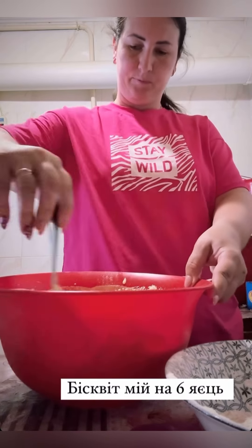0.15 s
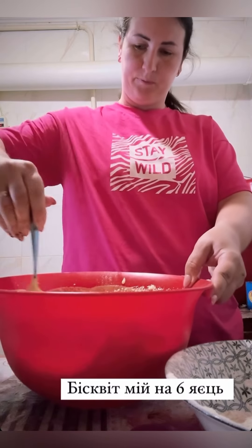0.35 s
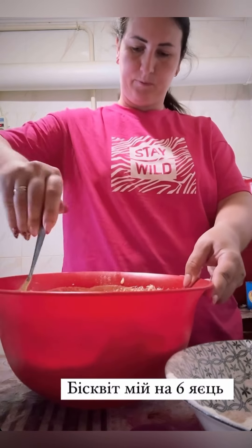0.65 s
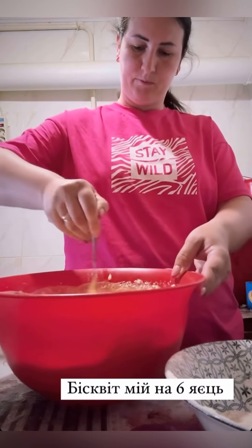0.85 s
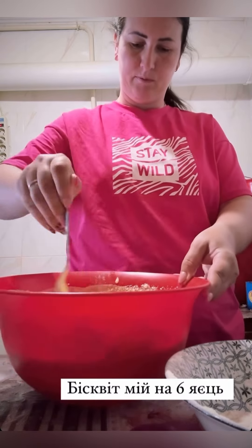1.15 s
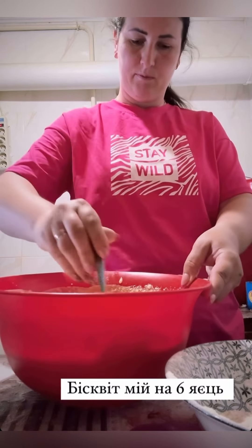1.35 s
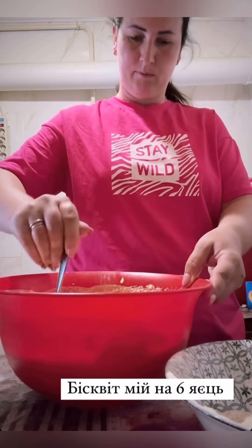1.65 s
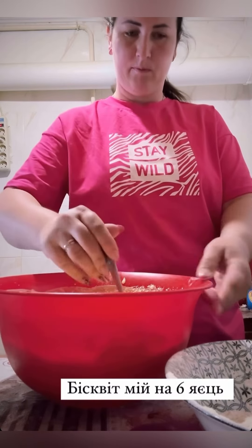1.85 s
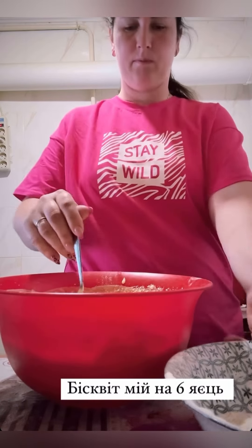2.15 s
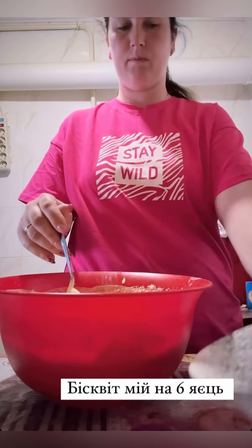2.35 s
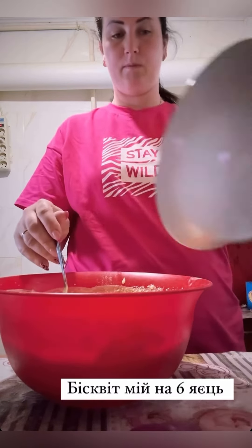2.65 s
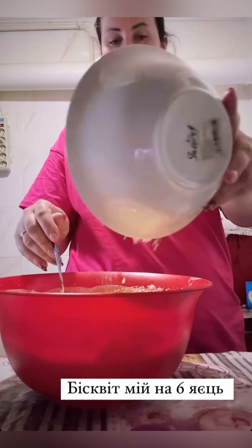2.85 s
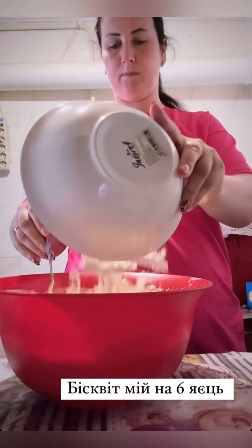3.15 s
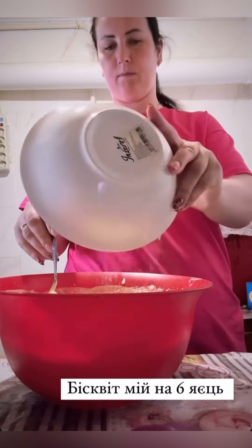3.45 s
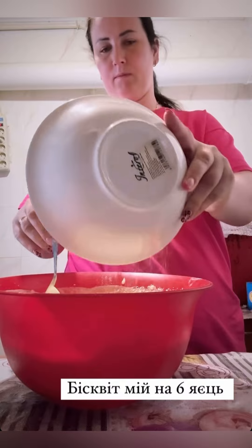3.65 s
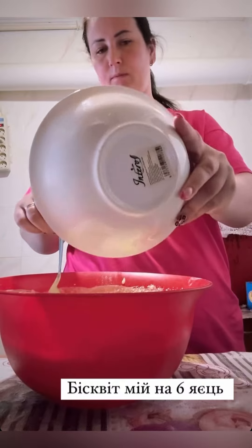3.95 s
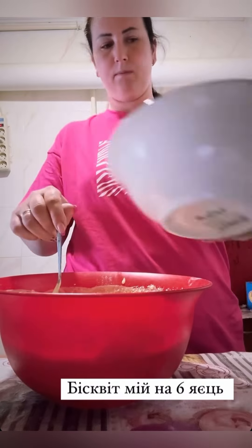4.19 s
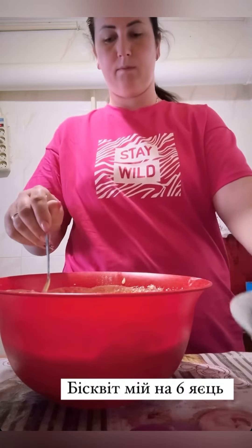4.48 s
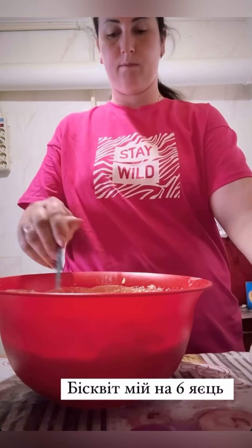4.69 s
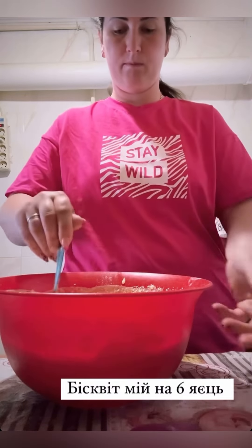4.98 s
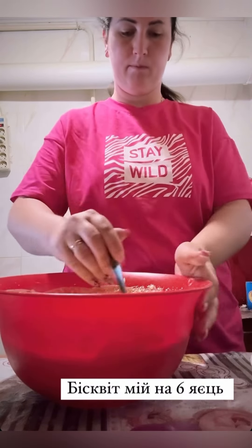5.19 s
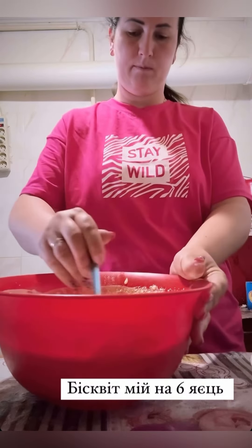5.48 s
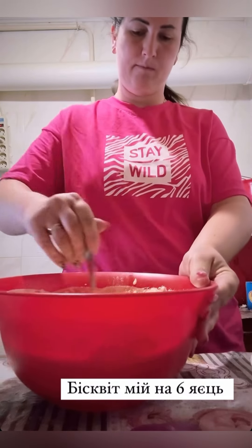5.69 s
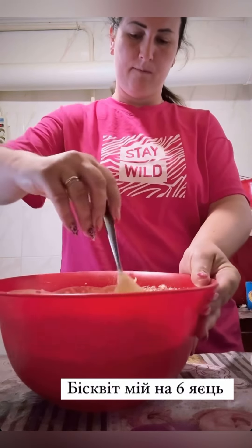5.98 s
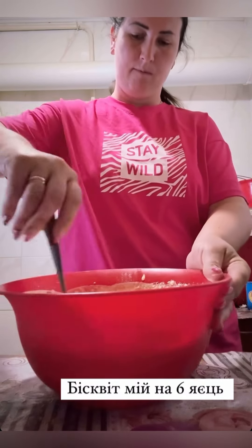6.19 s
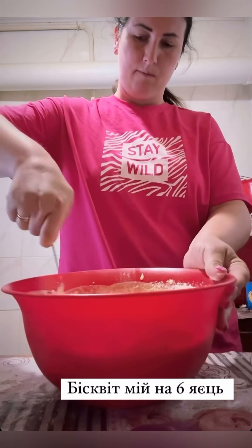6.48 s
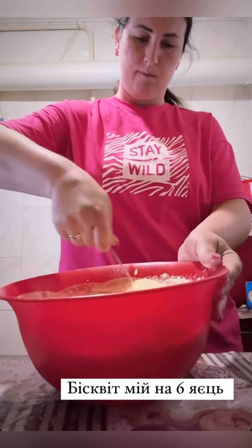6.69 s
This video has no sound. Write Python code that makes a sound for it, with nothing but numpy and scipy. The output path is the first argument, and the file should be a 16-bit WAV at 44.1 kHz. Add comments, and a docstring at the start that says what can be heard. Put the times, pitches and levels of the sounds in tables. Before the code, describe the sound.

Irregular spoon strokes rasp around a plastic mixing bowl; a soft wet tumble of fruit, a heavy table clunk, then more scraping.

```python
"""A metal spoon stirs thick batter in a plastic bowl: stick-slip grains and blows excite decaying modes and hiss.
Sticky batter lets go in short noise bursts; chopped fruit tipped in patters as coloured wet grains.
A second bowl is set down hard: blows ring the table's modes under a phone standing on it, and sines sing on.
Mains hum is a wavering sine; room air is coloured noise; a faint tick is noise bursts in alternating steps.
Dense decaying noise echoes stand for the kitchen."""
import sys
import numpy as np
from scipy import signal
from scipy.fft import rfft, irfft, next_fast_len
from scipy.io import wavfile
from scipy.ndimage import uniform_filter1d

SR = 44100
rng = np.random.default_rng(int(sys.argv[2]) if len(sys.argv) > 2 else 0)


def generate_wav(signal):
    """Clip the signal to [-1, 1] and save it as 16-bit WAV at the path in sys.argv[1]."""
    frames = np.transpose(np.atleast_2d(signal))
    scaled = np.clip(frames, -1, 1) * 32767
    pcm = np.round(scaled).astype(np.int16)
    wavfile.write(sys.argv[1], SR, pcm)


N = 301203

# All levels in the tables are relative; each source sets its own gain.
# strokes of the spoon along the wall: (start [s], length [s], scrape level [dB],
# sizzle above the scrape at the start [dB], at the end [dB])
STROKES = [(0.002, 0.097, -32, -10, 0), (0.153, .13, -33, -1, -7), (0.536, 0.16, -30.5, -14, -3.5),
           (0.73, 0.092, -33.5, -7.5, -5.5), (0.814, 0.047, -36, 5, -12), (0.988, 0.06, -42.5, -19, -10),
           (1.046, 0.21, -45, -18, -14.5), (1.282, 0.13, -27, -5, -7), (1.607, 0.062, -40, -9.5, -14.5),
           (1.67, 0.092, -25, -22.5, -7.5), (1.764, 0.034, -30, -3, -15.5), (1.953, 0.11, -46.5, -3, -16),
           (2.037, 0.13, -42, 0.5, -6), (4.727, 0.089, -44, 0.5, -5.5), (4.858, 0.14, -67, 14, -3),
           (5.046, 0.051, -49, -12, -22), (5.128, 0.031, -33, 4.5, -9), (5.167, 0.021, -31, -12, -8),
           (5.24, 0.088, -30.5, -15.5, -14.5), (5.369, 0.1, -31, -25, 5), (5.461, 0.1, -27, -1.5, -15.5),
           (5.582, 0.057, -26, -20, -13), (5.869, 0.045, -51, -9, -16), (5.917, 0.22, -39.5, -8.5, -6.5),
           (6.159, 0.048, -29, -14.5, -13.5), (6.257, 0.048, -31, -29, -7), (6.34, 0.091, -29.5, -8, -11.5),
           (6.475, 0.2, -34, -8, -13.5), (6.782, 0.027, -43, -14.5, -14.5)]
# spoon and fruit against the bowl: (time [s], bass level [dB], middle level [dB], treble level [dB])
BOWL_KNOCKS = [(0.541, -15, -9.5, -19), (0.57, -27, -30, -29), (1.268, -8, -14.5, -27),
               (1.576, -0.5, -3.5, -9), (1.694, -40, -14, -20.5), (2.037, -22, -28.5, -33.5),
               (3.119, -31, -37, -48), (3.158, -21.5, -30.5, -58), (3.181, -21, -27.5, -44),
               (3.206, -37.5, -36, -49), (4.722, -38, -35, -40), (5.112, -4.5, -21, -28),
               (5.241, -16, -36.5, -31.5), (5.357, -68, -19, -24.5), (5.398, -18.5, -17.5, -40),
               (6.167, -17.5, -15.5, -45.5), (6.792, -25.5, -46, -44.5)]
# the spoon edge catches on the wall, a thin bright knock: (time [s], level [dB])
EDGE_CATCHES = [(0.026, -30.5), (0.061, -36), (0.074, -21.5), (0.136, -28.5), (.249, -25.5), (0.257, -29),
                (0.683, -29.5), (0.696, -22.5), (0.766, -27), (0.788, -22.5), (0.805, -25.5),
                (1.323, -27.5), (1.353, -23.5), (1.381, -23.5), (1.398, -22), (1.413, -26.5), (1.726, -21),
                (1.74, -24), (5.099, -30.5), (5.52, -21.5), (5.641, -18.5), (6.269, -32), (6.319, -27.5)]
# modes of the plastic bowl: (frequency [Hz], level [dB], t60 [s])
BOWL_MODES = [(121, -6, 0.15), (156, -3, 0.091), (214.2, -1, 0.049), (275, 0, 0.078), (316, 5, 0.024),
              (464, -0.5, 0.046), (491, 1.5, 0.054), (656, 9.5, 0.013), (801, 2, 0.016), (987, -0.5, 0.014),
              (1364, -0.5, 0.019), (1674, -2.5, 0.036), (1761.3, 1.5, 0.017), (2066, 5, 0.022),
              (2540, -5.5, 0.011), (2736, -5, 0.042), (2960, -1.5, 0.02), (3423, -5.5, 0.023),
              (3813, -8, 0.014), (4700, -9.5, 0.0012)]
# modes of the metal spoon: (frequency [Hz], level [dB], t60 [s])
SPOON_MODES = [(3100, -10, 0.024), (4620, -4, 0.009), (4820, -2, 0.021), (5600, -7.5, 0.0076),
               (6680, -4, 0.0073)]
# spectrum of the scraping hiss: (frequency [Hz], level per Hz [dB])
SCRAPE_SPECTRUM = [(700, 0), (1300, -15), (1900, -5), (3200, 4.5), (4500, -3.5), (6500, -1), (8000, -20)]
# spectrum of the high sizzle: (frequency [Hz], level per Hz [dB])
SIZZLE_SPECTRUM = [(5000, -12.5), (7000, 2.5), (9000, 0), (10700, -2), (12500, 3), (15500, -4)]
# sticky batter lets go with a bright snap: (time [s], level [dB])
BATTER_SMACKS = [(0.4868, -25), (0.508, -28.5), (0.9136, -29), (0.953, -31.5), (1.0241, -26),
                 (1.1847, -29.5), (2.0378, -22.5), (4.7195, -16.5), (5.1592, -6.5), (5.351, -16),
                 (5.7442, -18), (5.7699, -27.5), (5.913, -34), (5.9514, -22), (5.9734, -15), (6.126, -19.5)]
# spectrum of those snaps: (frequency [Hz], level per Hz [dB])
SMACK_SPECTRUM = [(800, -13), (2500, -2), (6000, 0.5), (11000, 2.5), (15500, 1)]
# fruit tumbling in: (time [s], thud level [dB], wet patter level [dB])
FRUIT_POUR = [(2.82, -82, -77.5), (2.89, -38.5, -61.5), (2.946, -27.5, -50.5), (3.0, -26.5, -53.5),
              (3.15, -34, -57.5), (3.188, -32.5, -60), (3.234, -40, -68), (3.31, -74.5, -85.5)]
# spectrum of the wet patter: (frequency [Hz], level per Hz [dB])
PATTER_SPECTRUM = [(410, -8.5), (700, -3.5), (1060, -14.5), (1330, -6), (1520, -19.5), (1830, 1),
                   (2270, -23), (2860, -10), (5810, -25), (8450, -45)]
# the bowl is shoved against the table: (start [s], length [s], level [dB])
BOWL_SHOVES = [(0.0, 0.0047, -34), (.55, 0.013, -21.5), (.82, 0.033, -37), (1.04, 0.024, -36),
               (1.28, 0.0036, -31.5), (1.58, 0.012, -17), (1.69, 0.021, -27.5), (2.05, 0.02, -22),
               (5.12, 0.005, -15), (6.0, 0.14, -28)]
# dull blows into the table, from the bowl shifting, fruit landing and the second bowl set down
# and rocking: (time [s], bass level [dB], middle level [dB], treble level [dB])
TABLE_THUMPS = [(1.061, -26.5, -68, -60), (2.062, -13.5, -55.5, -24.5), (2.101, -21, -28.5, -26.5),
                (2.941, -35, -26.5, -37), (3.004, -40, -22.5, -33), (3.067, -28, -29.5, -35),
                (3.197, -22, -34.5, -46), (3.543, -78, -45, -67.5), (4.478, -32.5, -33, -13.5),
                (4.489, -2, -9, 0), (4.544, -11.5, -10.5, -25.5), (4.708, -20, -44, -59),
                (4.738, -22, -13, -31.5), (4.752, -4.5, 0, -18), (4.775, -26.5, -2, -57.5),
                (4.796, 1, -15, -49.5), (4.81, -8, -5.5, -19.5), (4.872, -19, -30.5, -44),
                (4.91, -15, -21, -53)]
# modes of the table: (frequency [Hz], level [dB], t60 [s])
TABLE_MODES = [(60.6, -4, 0.12), (90, 1.5, 0.12), (124.5, 0, 0.25), (149.5, -5, 0.21), (209.8, 4.5, 0.11),
               (264, -3, 0.11), (318, 0.5, 0.051), (387, 0, 0.05), (495, 1.5, 0.1), (570, 3, 0.047),
               (641, 3.5, 0.029), (772, 1, 0.024), (906, -4, 0.021), (1414, -11, 0.046),
               (1840, -3.5, 0.0037)]
# spectrum of the noise after a thump: (frequency [Hz], level per Hz [dB])
SLAM_SPECTRUM = [(400, 10.5), (1500, -16.5), (3000, -28), (9000, -29.5)]
# the second bowl sings faintly as it settles: (time [s], frequency [Hz], level [dB], t60 [s])
BOWL_SINGS = [(4.655, 2870, -53.5, 0.41), (4.86, 778, -51.5, 1)]
# spectrum of the tick, also of the snap after each blow: (frequency [Hz], level per Hz [dB])
TICK_SPECTRUM = [(600, -20.5), (1500, -1.5), (2500, -3.5), (5000, -7.5), (9000, -12), (15000, -12)]
# spectrum of the room air: (frequency [Hz], level per Hz [dB])
AIR_SPECTRUM = [(40, -28), (70, -2.5), (200, -12.5), (500, -12), (800, -22), (1200, -30.5), (2200, -26.5),
                (5000, -36), (16000, -36)]
# weighting of the sound thrown back by the walls: (frequency [Hz], level [dB])
WALL_WEIGHTS = [(60, -28.5), (150, -15), (400, 0), (1000, 7.5), (2500, 4), (5500, 5.5), (7000, -26.5),
                (9700, 2), (16000, -10.5)]
# the phone's two ports hear the treble out of step: (frequency [Hz], phase by which left leads [rad])
PORT_LEADS = [(20, 0), (900, .5), (1600, -.2), (3000, -.6), (4000, -.1), (5500, -.7), (7400, -np.pi),
              (8900, -np.pi), (10600, -2 * np.pi), (13000, -2 * np.pi), (14600, -3 * np.pi),
              (22050, -3 * np.pi)]
# the shaken phone hears blows differently at each port: (frequency [Hz], level [dB])
SHAKEN_WEIGHTS = [(60, -28.5), (250, -15), (500, -14), (1100, 6), (2200, -18), (4000, -16.5)]

STROKE_RISE_DB_PER_S, STROKE_FALL_DB_PER_S = 1498.5, 327
SETTLE_DB, SETTLE_DB_PER_S = -21.5, 69  # the batter slumps back after each stroke
CATCH_RASP_DB, CATCH_RISE_DB_PER_S, CATCH_FALL_DB_PER_S = -1.5, 1495.5, 750.5  # swell around a catch
FLEX_DB, LOAD_DB = -9, -8  # the wall flexes and the table is loaded in step with the scrape
SHOVE_RISE_DB_PER_S, SHOVE_FALL_DB_PER_S = 490.5, 221.5
KNOCK_TOP_DB = 1.5  # a full knock gains less from treble to top than a catch
CATCH_BASS_DB, CATCH_MIDDLE_DB, CATCH_TREBLE_DB = -24.5, -40.5, -9.5
CATCH_SPOON_DB, CATCH_CLICK_DB = -9, 7.5  # a catch also strikes the spoon and clicks drily
SPOON_DB, SPOON_FOLLOWS = -25.5, 1.2  # bright strokes ring the spoon; dB per dB of sizzle
LUCK_DB = 2.5  # how much a mode's share differs from blow to blow
WANDER_DB = 3.5  # how far each treble mode's share of the rub wanders
BASS_LAG_S = 0.00673  # how far 100 Hz trails the high-frequency limit through plastic and wood
TICK_FIRST_S, TICK_EVERY_S, TOCK_EARLY_S = .072, .2324, .008  # every second tick comes early
TICK_DB, TICK_T60_S, TICK_SOFT_S = -54.5, 0.13, 0.0073
HUM_HZ, HUM_DB = 49.2, -49
AIR_DB = -62.5
KITCHEN_T60_S, KITCHEN_DB = 0.14, -8.5
BASS_CUT_HZ, CUTOFF_HZ = 36, 15850


def stirring():
    """Friction and impact drive resonators: blows on bowl and table, and the rubbing sounds beside them."""
    scrape_db, sizzle_db, flex_db, load_db = stroke_levels()
    thud_db, patter_db = in_time(FRUIT_POUR)
    bright_db = np.maximum(sizzle_db, -20)
    slip = stick_slip()
    rub = amp(scrape_db - 0.16 * bright_db - 4.0) * slip  # duller strokes ring the bowl more
    judder = grains(per_s=430.0, spread_db=2.5, clump_db=1.0, clump_rate=74.0)
    flex = (amp(flex_db) + amp(thud_db - 19)) * judder
    push = (amp(load_db) + amp(thud_db)) * judder
    blows = bending(struck_bowl(rub, flex, sizzle_db) + struck_table(push))

    # a brighter stroke puts more into the hiss
    hiss_gain = amp(scrape_db + 0.92 * bright_db + 2.5)
    hiss = hiss_gain * patchy(slip, SCRAPE_SPECTRUM, patch_db=6.0, rate=3.8)
    fine = 0.16 * slip + rng.standard_normal(N)
    sizzle_gain = amp(scrape_db + sizzle_db + 2.5) + amp(patter_db - 7.0)
    sizzle = sizzle_gain * rms_one(colour(fine, SIZZLE_SPECTRUM))
    spoon = ringing_spoon(amp(scrape_db + SPOON_FOLLOWS * bright_db + SPOON_DB) * slip)
    clicks = cracks(EDGE_CATCHES, CATCH_CLICK_DB, 0.002, SCRAPE_SPECTRUM)
    return blows, hiss + sizzle + spoon + clicks + wet_patter(patter_db)


def stroke_levels():
    """Contact force follows the strokes: levels in dB of scrape, sizzle above it, wall flexing and load."""
    stroke_db, stroke, along = swells(STROKES, STROKE_RISE_DB_PER_S, STROKE_FALL_DB_PER_S)
    early_db, late_db = np.array(STROKES)[stroke, 3:].T
    sizzle_db = uniform_filter1d(early_db + along * (late_db - early_db), size=SR // 100)
    shove_db = swells(BOWL_SHOVES, SHOVE_RISE_DB_PER_S, SHOVE_FALL_DB_PER_S)[0]
    load_db = np.maximum(shove_db, stroke_db + LOAD_DB)
    settling = [(s, length, db + SETTLE_DB) for s, length, db, *_ in STROKES]
    settle_db = swells(settling, STROKE_RISE_DB_PER_S, SETTLE_DB_PER_S)[0]
    rasps = [(s, .004, db + CATCH_RASP_DB) for s, db in EDGE_CATCHES]
    rasp_db = swells(rasps, CATCH_RISE_DB_PER_S, CATCH_FALL_DB_PER_S)[0]
    scrape_db = np.max([stroke_db, settle_db, rasp_db], axis=0)
    return scrape_db, sizzle_db, stroke_db + FLEX_DB, load_db


def stick_slip():
    """Stick-slip friction: dense fine slips of the edge, with coarse grains caught under it; rms 1."""
    slip = grains(per_s=7000., spread_db=0.5, clump_db=0.5, clump_rate=13.0)
    grit = grains(per_s=550.0, spread_db=2.0, clump_db=3.0, clump_rate=24.0)
    return rms_one(slip + grit)


def struck_bowl(rub, flex, sizzle_db):
    """Modal excitation of a shell: blows ring every mode, rubbing the treble ones, flexing lower ones."""
    knocks = [(*row, row[3] + KNOCK_TOP_DB) for row in BOWL_KNOCKS]
    for s, db in EDGE_CATCHES:
        knocks.append((s, db + CATCH_BASS_DB, db + CATCH_MIDDLE_DB, db + CATCH_TREBLE_DB, db))

    def shaking(hz):
        """Continuous forcing of a mode: rub above 1750 Hz, flex from 250 Hz up to there."""
        if hz > 1750:
            # each mode wanders as the spoon moves round; above 2600 Hz brisk strokes reach it more
            tilt_db = .3 * sizzle_db * np.log2(hz / 2600)
            return amp(-31.0 + WANDER_DB * drift(16.0) + tilt_db) * rub
        share = amp(-2.0) if hz > 900 else hz > 250
        return amp(-27.0) * flex * share

    return body(BOWL_MODES, knocks, [150, 550, 1500, 3000], blow_db=-1.0,
                chatter_db=-30.5, chatter_s=0.045, shaking=shaking)


def struck_table(push):
    """Modal excitation of a plate: thumps ring every mode and the push only those below 250 Hz."""
    return body(TABLE_MODES, TABLE_THUMPS, [90, 205, 650], blow_db=-2.5,
                chatter_db=-36.5, chatter_s=0.22, shaking=lambda hz: amp(-31.5) * push * (hz < 250))


def body(modes, blows, column_hz, blow_db, chatter_db, chatter_s, shaking):
    """Modal superposition: blows weight each mode by their colour and chatter on; shaking(hz) adds force."""
    blows = np.array(blows)
    at = np.round(blows[:, 0] * SR).astype(int)
    out = np.zeros(N)
    luck = rng.normal(0, LUCK_DB, (len(at), len(modes)))
    chatter = amp(chatter_db) * grains(per_s=4600.0, spread_db=4.5, clump_db=3.0, clump_rate=180.0)
    for k, (hz, level_db, t60) in enumerate(modes):
        hits = np.zeros(N)
        tint_db = np.array([at_hz(hz, column_hz, row[1:]) for row in blows])
        hits[at] = amp(tint_db + blow_db + luck[:, k])
        force = hits + decay(hits, chatter_s) * chatter + shaking(hz)
        out += amp(level_db) * (-1) ** k * ring(force, hz, t60)  # neighbours in opposite phase
    return out


def bending(x):
    """Dispersion of bending waves: they are slower in the bass, so each blow sweeps downward."""
    size = next_fast_len(N + SR // 10)
    hz = np.maximum(np.arange(size // 2 + 1) * SR / size, 40)
    lag = BASS_LAG_S * (np.sqrt(100 / hz) - np.sqrt(100 / 2500))  # group delay, nil at 2500 Hz
    phase = 2 * np.pi * np.cumsum(lag) * SR / size
    return irfft(rfft(x, size) * np.exp(-1j * phase), size)[:N]


def ringing_spoon(brisk):
    """Resonance of a metal bar: brisk slips and the catches excite its modes, whose levels drift."""
    s, db = np.transpose(EDGE_CATCHES)
    brisk[np.round(s * SR).astype(int)] += amp(db + CATCH_SPOON_DB)
    return sum(amp(db + 4.9 * drift(11.0)) * ring(brisk, hz, t60) for hz, db, t60 in SPOON_MODES)


def patchy(x, spectrum, patch_db, rate):
    """Band modulation: half-octave slices of the coloured sound brighten and fade on their own; rms 1."""
    x = colour(x, spectrum)
    edges = 500 * 2 ** np.arange(0, 4.6, .5)
    out = np.zeros(N)
    for k, pair in enumerate(zip(edges, edges[1:])):
        band = signal.sosfilt(signal.butter(2, pair, "band", fs=SR, output="sos"), x)
        out += band * amp(patch_db * drift(rate)) * (-1) ** k
    return rms_one(out)


def wet_patter(patter_db):
    """Granular impacts: many small wet contacts of tumbling fruit merge into coloured noise."""
    wet = grains(per_s=4800.0, spread_db=1.0, clump_db=3.0, clump_rate=65.0)
    return amp(patter_db) * rms_one(colour(wet, PATTER_SPECTRUM))


def contact_noise():
    """Broadband transients: snaps after blows, a slam after each thump, smacks of batter letting go."""
    knocks = [(row[0], row[3]) for row in BOWL_KNOCKS] + list(EDGE_CATCHES)
    thumps = [(row[0], row[3]) for row in TABLE_THUMPS]
    snaps = cracks(knocks, -7.5, 0.05, TICK_SPECTRUM) + cracks(thumps, -27.5, 0.05, TICK_SPECTRUM)
    slams = cracks(thumps, -24.5, 0.57, SLAM_SPECTRUM)
    smacks = cracks(BATTER_SMACKS, -3.5, 0.005, SMACK_SPECTRUM)
    return snaps, slams, smacks


def cracks(blows, crack_db, t60, spectrum):
    """Exponential decay of broadband noise: a coloured burst that dies after each contact."""
    start = np.zeros(N)
    for s, level_db in blows:
        start[round(s * SR)] = amp(level_db + crack_db)
    return decay(start, t60) * rms_one(colour(rng.standard_normal(N), spectrum))


def singing():
    """Free vibration: the second bowl's lightly damped modes ring as single decaying sines."""
    out = np.zeros(N)
    for s, hz, level_db, t60 in BOWL_SINGS:
        touch = np.zeros(N)
        touch[round(s * SR)] = amp(level_db)
        out += ring(touch, hz, t60)
    return out


def ticking():
    """Periodic impulses: decaying noise bursts with a soft start, every second one early."""
    t = np.arange(N) / SR
    tick_s = np.arange(TICK_FIRST_S, N / SR - .01, TICK_EVERY_S)
    tick_s = tick_s - TOCK_EARLY_S * (np.arange(len(tick_s)) % 2)
    levels_db = TICK_DB + rng.normal(0, 0.5, len(tick_s))
    ticks = cracks(zip(tick_s, levels_db), 0, TICK_T60_S, TICK_SPECTRUM)
    since_tick = t - tick_s[np.searchsorted(tick_s, t) - 1]
    return ticks * np.clip(since_tick / TICK_SOFT_S, 0, 1)


def hum():
    """Phase and amplitude modulation: a mains sine that wavers a little."""
    phase = 2 * np.pi * HUM_HZ * np.arange(N) / SR + 0.33 * drift(3.3)
    return amp(HUM_DB + drift(8.0)) * np.sin(phase)


def room_air():
    """Stationary random noise: coloured air whose level drifts slightly."""
    level_db = AIR_DB + 0.55 * drift(12.0) + 1.3 * drift(0.52)
    return amp(level_db) * rms_one(colour(rng.standard_normal(N), AIR_SPECTRUM))


def kitchen(x):
    """Diffuse reverberation: dense echoes that die exponentially, independent at each port."""
    t = np.arange(SR // 2) / SR
    echoes = rng.standard_normal((2, len(t))) * amp(-60 * t / KITCHEN_T60_S) * (t > .002)
    echoes = echoes / np.sqrt(np.sum(echoes ** 2, axis=1, keepdims=True))
    return signal.fftconvolve(colour(x, WALL_WEIGHTS)[None], echoes, axes=1)[:, :N]


def ports(x):
    """Interchannel phase difference: one sound as the two microphone ports hear it."""
    size = next_fast_len(N + 999)
    lead = np.interp(np.arange(size // 2 + 1) * SR / size, *np.transpose(PORT_LEADS))
    return irfft(rfft(x, size) * np.exp(.5j * lead * [[1], [-1]]), size)[:, :N]


def shaken_phone(x):
    """Quadrature: blows turned a quarter cycle, with opposite sign at the two ports."""
    quarter_turned = signal.hilbert(colour(x, SHAKEN_WEIGHTS), next_fast_len(N)).imag[:N]
    return quarter_turned * [[1], [-1]]


def swells(rows, rise_db_per_s, fall_db_per_s):
    """Exponential envelopes rise, hold, fall: gives the loudest level, its row and the fraction along it."""
    t = np.arange(0, N, 8) / SR  # worked out at every eighth sample
    start, length, level_db = np.transpose(rows)[:3, :, None]
    before = np.maximum(start - t, 0)
    after = np.maximum(t - start - length, 0)
    shape = level_db - rise_db_per_s * before - fall_db_per_s * after
    row = np.argmax(shape, axis=0)
    along = np.clip((t - start[row, 0]) / length[row, 0], 0, 1)
    return [np.repeat(v, 8)[:N] for v in (shape.max(axis=0), row, along)]


def ring(x, hz, t60):
    """Damped resonator: a unit click sets a sine of about unit height ringing."""
    r, w = amp(-60 / (t60 * SR)), 2 * np.pi * hz / SR
    return signal.lfilter([0, np.sin(w)], [1, -2 * r * np.cos(w), r * r], x + 1e-18)


def decay(x, t60):
    """Exponential decay: every click in x dies by 60 dB in t60 seconds."""
    return signal.lfilter([1], [1, -amp(-60 / (t60 * SR))], x + 1e-18)


def grains(per_s, spread_db, clump_db, clump_rate):
    """Random impulse process: clicks of uneven size that come in louder and softer clumps; rms 1."""
    sizes = amp(spread_db * np.minimum(rng.exponential(1, N), 5)) * rng.choice([-1, 1], N)
    return rms_one(sizes * (rng.random(N) < per_s / SR) * amp(clump_db * drift(clump_rate)))


def drift(rate):
    """Low-passed random process: slow chance of rms 1, with its corner near rate in Hz."""
    r = np.exp(-2 * np.pi * rate / SR)
    noise = rng.standard_normal(N + SR)
    return rms_one(signal.lfilter([1], [1, -2 * r, r * r], noise)[SR:])  # first second: filter run-in


def colour(x, spectrum):
    """Linear filtering: weight the spectrum of x by a smooth curve."""
    size = next_fast_len(N)
    hz = np.maximum(np.arange(size // 2 + 1) * SR / size, 1)
    return irfft(rfft(x, size) * amp(at_hz(hz, *np.transpose(spectrum))), size)[:N]


def at_hz(hz, points_hz, values):
    """Interpolation by straight lines on a log-frequency axis."""
    return np.interp(np.log(hz), np.log(points_hz), values)


def in_time(rows):
    """Interpolation in time of each level column; -120 dB outside the table."""
    s, *columns = np.transpose(rows)
    return [np.interp(np.arange(N) / SR, s, c, left=-120, right=-120) for c in columns]


def amp(db):
    """Logarithmic level: dB to gain."""
    return 10 ** (np.asarray(db) / 20)


def rms_one(x):
    """Normalisation to rms 1."""
    return x / np.sqrt(np.mean(x ** 2) + 1e-20)


def scene():
    """Superposition: the near sources, air and hum at both ports, the shaking, and the kitchen's echo."""
    blows, rubbing = stirring()
    snaps, slams, smacks = contact_noise()
    near = blows + rubbing + snaps + slams + smacks + singing() + ticking()
    air = room_air()
    direct = ports(near + air + hum())
    return direct + shaken_phone(blows + slams) + amp(KITCHEN_DB) * kitchen(near + air)


def record(dry):
    """Saturation and band limiting: peaks overload the input; deep bass and the top are cut."""
    bass_cut = signal.butter(2, BASS_CUT_HZ, "high", fs=SR, output="sos")
    top_cut = signal.ellip(12, .5, 70, CUTOFF_HZ, fs=SR, output="sos")
    loud = signal.sosfilt(bass_cut, np.clip(dry, -1, 1))
    return signal.sosfilt(top_cut, np.clip(loud, -1, 1))


dry = scene()
out = record(dry)
generate_wav(out)
```